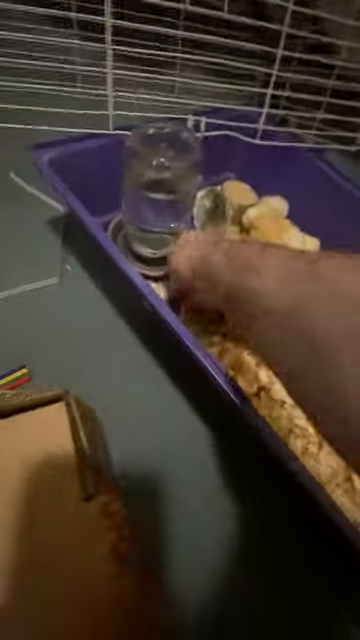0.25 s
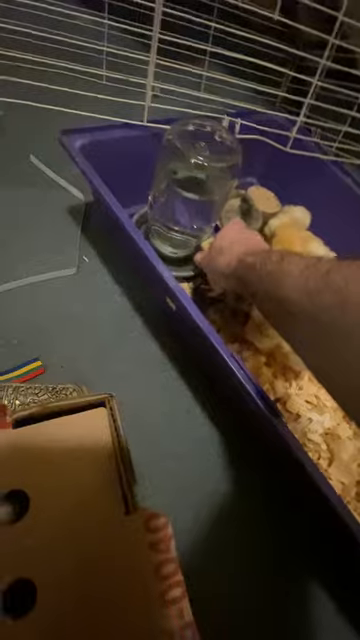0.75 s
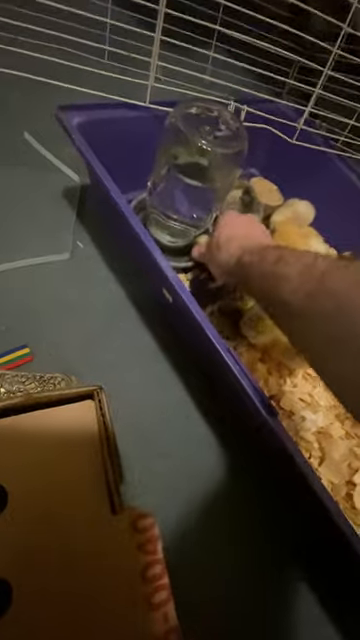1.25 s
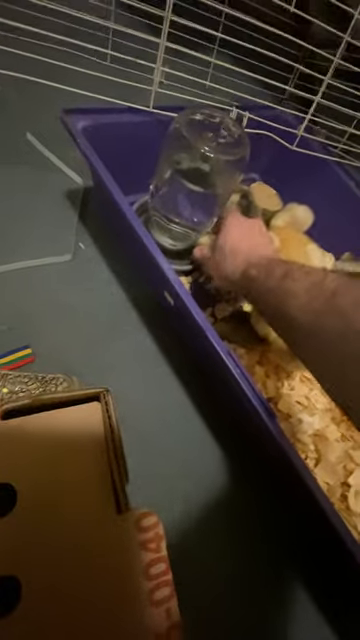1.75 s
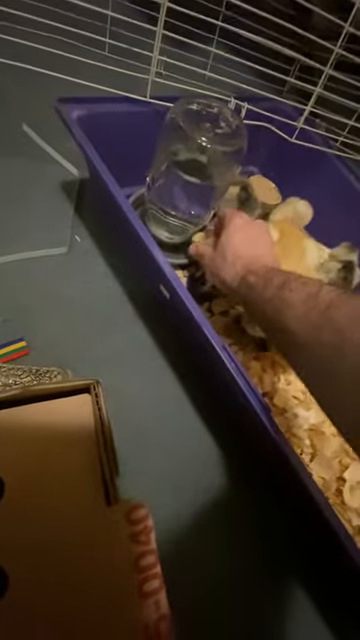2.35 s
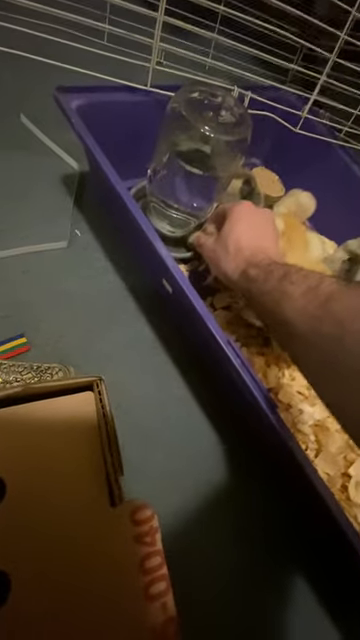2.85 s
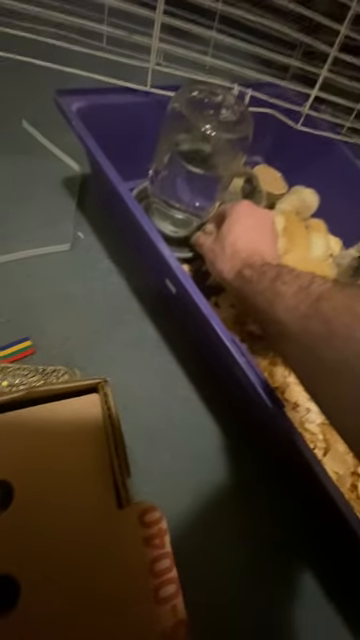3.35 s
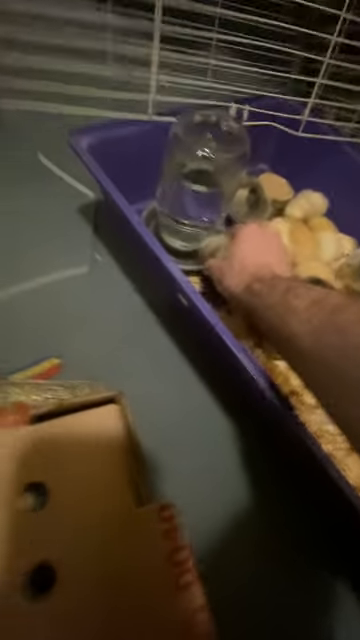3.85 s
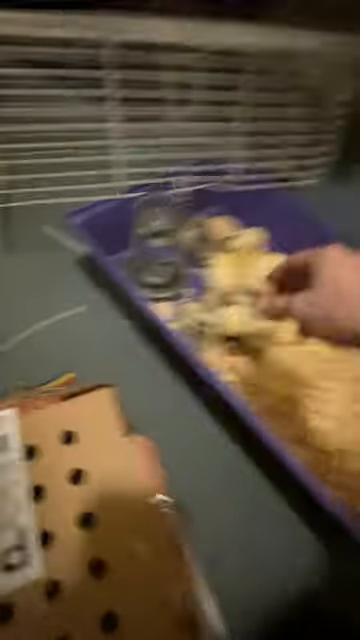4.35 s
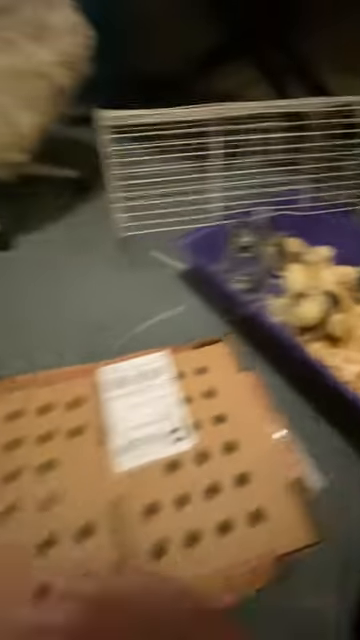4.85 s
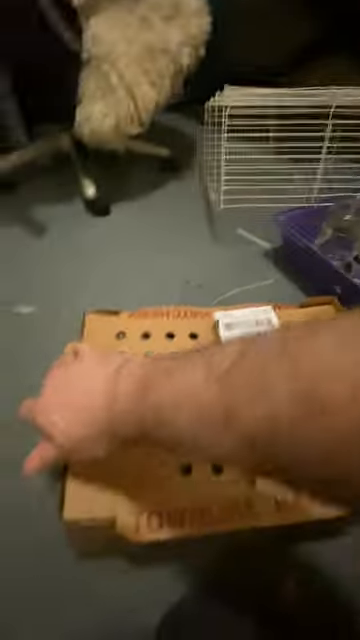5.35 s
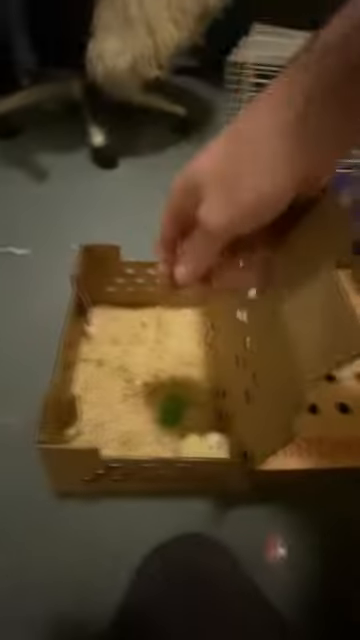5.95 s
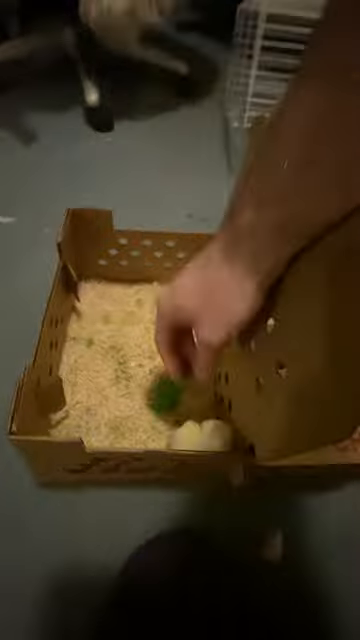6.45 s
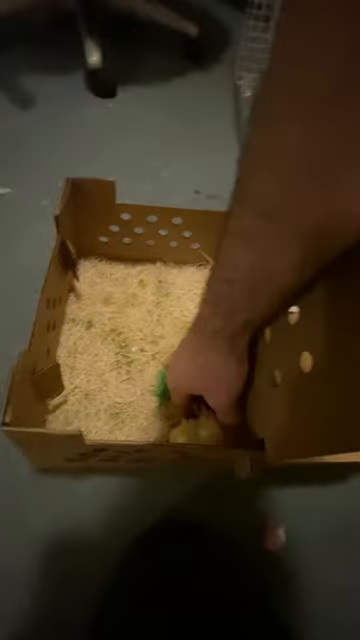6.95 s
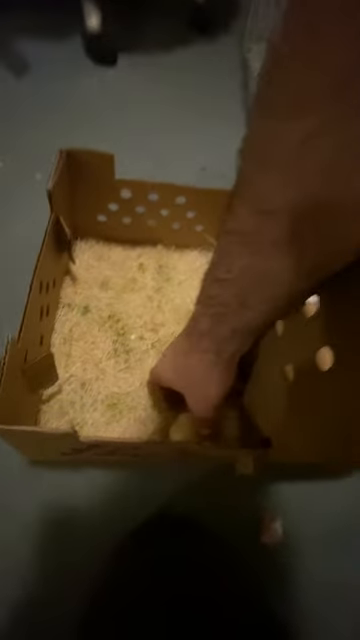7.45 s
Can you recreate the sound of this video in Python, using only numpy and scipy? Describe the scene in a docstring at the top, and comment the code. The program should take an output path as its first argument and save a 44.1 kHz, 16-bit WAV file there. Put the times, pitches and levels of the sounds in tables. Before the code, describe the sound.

A flock of chicks cheeps in high, falling notes, one repeating a hoarse call, while a cardboard box is lightly knocked and scraped.

```python
"""Day-old chicks peep in a plastic tub and a cardboard box, close to a hand-held phone.
From the start the flock whistles in clear falling tones over rustling shavings and a rumbling grip.
One hoarse chick calls once, then about twice a second from 1.3 s. Near 3 s beaks peck the tub;
then fingers tap the shavings and the box knocks. From 5.4 s the lid scrapes and the phone
turns away from the tub, so the voices have less treble and more room."""
import sys
import numpy as np
from scipy import signal
from scipy.fft import rfft, irfft, next_fast_len
from scipy.io import wavfile
from scipy.ndimage import uniform_filter1d, map_coordinates

SR = 44100
rng = np.random.default_rng(int(sys.argv[2]) if len(sys.argv) > 2 else 0)


def inscribe(sig):
    """Save sig as 16-bit PCM at rate SR to the path in sys.argv[1].

    A 1-D sig is mono; a 2-D sig holds one channel per row.
    Samples are clipped to [-1, 1] before scaling.
    """
    pcm = np.round(np.clip(np.atleast_2d(sig).T, -1, 1) * 32767)
    wavfile.write(sys.argv[1], SR, pcm.astype(np.int16))


N = 339129
TIME_S = np.arange(N) / SR


def amp(db):
    return 10 ** (np.asarray(db) / 20)


def unit_rms(x):
    return x / np.sqrt(np.mean(x ** 2) + 1e-20)


def along(points, hz):
    """Interpolate (Hz, value) points on a log axis."""
    f, v = np.transpose(points)
    return np.interp(np.log(hz + 1), np.log(f + 1), v)


def wobble(rate_hz, size=N):
    """Smooth random curve, rate_hz knots a second."""
    knots = rng.standard_normal(int(size * rate_hz / SR) + 4)
    return map_coordinates(knots, [np.arange(size) * rate_hz / SR])


def filtered(x, response):
    """Apply a complex frequency response."""
    size = next_fast_len(x.shape[-1] + 8192)
    return irfft(rfft(x, size) * response(np.fft.rfftfreq(size, 1 / SR)), size)[..., :N]


def add(track, start_s, sound):
    part = track[..., round(start_s * SR):][..., :sound.shape[-1]]
    part += sound[..., :part.shape[-1]]


# Each row: frequency in Hz, left-right coherence from 0 to 1.
COHERENCE = [(200, 0.5), (900, 0.67), (2200, 0.47), (6000, 0.2), (9000, 0.98)]

def diffuse(pair, spectrum):
    """Diffuse field: two unrelated signals become a partly coherent left and right."""
    def response(hz):
        angle = np.arccos(np.clip(along(COHERENCE, hz), 0, 1)) / 2
        return amp(along(spectrum, hz)) * [np.cos(angle), np.sin(angle)]
    mid, side = filtered(pair, response)
    return np.array([mid + side, mid - side])


def grainy_noise(spectrum, depth_db, rate_hz):
    """Diffuse noise with a flickering level."""
    grains = rng.standard_normal((2, N)) * amp(depth_db * wobble(rate_hz))
    return unit_rms(diffuse(grains, spectrum))


# Each row: time in seconds, then rumble, rustle and hiss levels in dB.
HANDLING_LEVELS = [(0, -91, -53.5, -52.5), (.45, -60.5, -60, -54.5), (0.6, -70, -69, -65),
                   (1.2, -74, -62, -66), (2.3, -67, -63.5, -59.5), (3.0, -61, -71.5, -54),
                   (3.4, -63, -93.5, -70.5), (3.9, -62.5, -60, -63), (4.6, -51, -59, -55.5),
                   (4.85, -69.5, -66, -60), (5.4, -59.5, -64, -64), (5.8, -70.5, -66, -47),
                   (5.95, -73, -67.5, -37.5), (6.08, -88, -55, -50), (6.3, -86, -56.5, -40.5),
                   (6.9, -72, -52.5, -44.5), (7.06, -66, -59, -55.5), (7.69, -80.5, -56, -57.5)]

def handling_gain(layer, drift_db, rate_hz):
    """Envelope of one handling noise, with random drift."""
    times_s, *levels_db = np.transpose(HANDLING_LEVELS)
    level_db = np.interp(TIME_S, times_s, levels_db[("rumble", "rustle", "hiss").index(layer)])
    return amp(level_db + drift_db * wobble(rate_hz))


# Each row: frequency in Hz, spectral density in dB.
GRIP_SPECTRUM = [(20, -38), (50, 2), (90, -5), (200, -15), (700, -19), (1200, -76)]

def grip_rumble():
    """The hand on the phone rumbles in lumps."""
    gain = handling_gain("rumble", drift_db=2.5, rate_hz=7)
    return gain * grainy_noise(GRIP_SPECTRUM, depth_db=3.5, rate_hz=28)


# Each row: frequency in Hz, spectral density in dB.
SHAVINGS_SPECTRUM = [(100, -6.5), (400, -5.5), (800, -2), (1250, -7.5), (2200, -8), (5000, -8.5),
                     (10000, -55)]

def shavings_rustle():
    """Feet and fingers stir the shavings."""
    gain = handling_gain("rustle", drift_db=2.4, rate_hz=11)
    return gain * grainy_noise(SHAVINGS_SPECTRUM, depth_db=3, rate_hz=70)


# Each row: start in seconds, level in dB.
FINGER_TAPS = [(3.738, -49.5), (3.997, -41), (4.093, -42.5), (5.507, -40), (5.593, -47), (5.795, -50),
               (6.766, -41.5), (6.944, -44), (7.084, -49.5)]

def finger_taps(t60_s=0.06, attack_s=0.00058):
    """Fingers tap the shavings: short dry puffs."""
    gate, t = np.zeros(N), np.arange(SR // 10) / SR
    for start_s, db in FINGER_TAPS:
        add(gate, start_s, amp(db - 60 * t / t60_s) * (1 - np.exp(-t / attack_s)))
    return gate * unit_rms(diffuse(rng.standard_normal((2, N)), SHAVINGS_SPECTRUM))


def blow(modes, thud_db=0, attack_s=0.0018, crack_t60_s=0.01):
    """A struck wall rings at random strengths, with a papery crack; the last mode is the thud."""
    t = np.arange(SR // 5) / SR
    levels_db = np.array(modes)[:, 1] + rng.normal(0, 0.84, len(modes))
    levels_db[-1] += thud_db
    ring = sum(amp(db - 60 * t / t60_s) * np.sin(2 * np.pi * hz * t)
               for (hz, _, t60_s), db in zip(modes, levels_db))
    crack = 0.24 * amp(-60 * t / crack_t60_s) * rng.standard_normal(len(t))
    return ring * (1 - np.exp(-t / attack_s)) + crack


# Each row: frequency in Hz, level in dB, T60 in seconds.
TUB_MODES = [(526, 6, 0.05), (300, -7.5, 0.033)]
# Each row: start in seconds, level in dB.
BEAK_PECKS = [(2.592, -44), (2.907, -49.5), (3.074, -44.5), (3.133, -50)]

def beak_pecks():
    """Beaks strike the tub wall."""
    track = np.zeros(N)
    for start_s, db in BEAK_PECKS:
        add(track, start_s, amp(db) * blow(TUB_MODES))
    return track


# Each row: frequency in Hz, level in dB, T60 in seconds.
BOX_MODES = [(336, -1.5, 0.043), (435, 1.5, 0.018), (766, -13, 0.04), (84, 11, 0.05)]
# Each row: start in seconds, level in dB, thud gain in dB.
BOX_KNOCKS = [(0.422, -44.5, -25), (3.744, -48, -4.5), (4.091, -32, -36), (4.137, -59, 17),
              (4.362, -47.5, 4), (4.538, -60.5, 17.5), (4.623, -54, 12), (4.685, -43, -12.5),
              (5.508, -21, -25.5), (5.538, -35, -13), (5.79, -65, 13.5), (5.932, -57.5, 9.5),
              (6.766, -39.5, -28.5)]

def box_knocks():
    """Knocks ring the cardboard box."""
    track = np.zeros(N)
    for start_s, db, thud_db in BOX_KNOCKS:
        add(track, start_s, amp(db) * blow(BOX_MODES, thud_db))
    return track


# Each row: start in seconds, end in seconds, level in dB.
LID_SCRAPES = [(5.443, 5.545, -40), (5.842, 5.97, -59), (7.351, 7.613, -52.5)]
# Each row: frequency in Hz, spectral density in dB.
CARD_SPECTRUM = [(2000, -17.5), (4300, -12), (5500, -5.5), (8000, -12), (10300, -12.5)]

def cardboard_friction(rise_s=0.039, fall_s=0.066, width_hz=90):
    """Card and fluff hiss; the scraping lid adds hiss and excites the hollow box."""
    def hollow(f):
        return 1 + sum(1j * f * width_hz / (hz * hz - f * f + 1j * f * width_hz)
                       for hz, _, _ in BOX_MODES[:3])
    scrape = sum(amp(db) * np.clip(np.minimum((TIME_S - start) / rise_s, (end - TIME_S) / fall_s), 0, 1)
                 for start, end, db in LID_SCRAPES)
    body = filtered(grainy_noise(SHAVINGS_SPECTRUM, depth_db=2, rate_hz=200), hollow)
    hiss_gain = handling_gain("hiss", drift_db=2.65, rate_hz=12) + 0.8 * scrape
    return scrape * body + hiss_gain * grainy_noise(CARD_SPECTRUM, depth_db=1, rate_hz=90)


# Each row: frequency in Hz, overtone gain in dB.
BEAK_RESPONSE = [(7300, -2), (8200, -11.5), (9500, -11), (10700, -17.5)]

def syrinx(corners, octave_db, rasp_db, breath_rad, edge_s=0.0065):
    """Gliding, fluttering tone through (s, Hz, dB) corners: 2 for a glide, 3 if held, 4 if hoarse."""
    s, hz, db = np.transpose(corners)
    held, hoarse = len(s) == 3, len(s) == 4
    t = np.arange(s[0] - edge_s, s[-1] + edge_s, 1 / SR)
    age_s, size = t - t[0], len(t)
    leg = np.clip(np.searchsorted(s, t) - 1, 0, len(s) - 2)
    progress = np.maximum(t - s[leg], 0) / np.diff(s)[leg]

    bend = np.where((leg == 0) & (held or hoarse), 1.9, np.where(leg == 2, 1.7, 1.15))
    pitch = hz[leg] + np.diff(hz)[leg] * progress ** bend
    pitch *= 1 + 0.066 * hoarse * (leg == 0) * np.sin(np.pi * progress) ** 2  # strain lifts the note
    scoop, scoop_s = (0.0718, 0.01104) if held else (0.0293, 0.0071)  # slide up into the note
    jitter = 0.01149 * wobble(61.1, size) + 0.0083 * wobble(25.04, size)
    pitch = uniform_filter1d(pitch, 150) * (1 - scoop * np.exp(-age_s / scoop_s) + jitter)
    pitch *= 1 - 0.049 * np.exp((t - t[-1]) / 0.0078)  # the last breath dives

    strain = np.clip((pitch - 4550) / 550, 0.1, 1) * np.minimum(age_s / 0.05, 1)  # high register
    flutter = amp(rasp_db) * strain * (0.32 * wobble(300.7, size) + 0.44 * wobble(3500, size))
    flutter = 2.45 * np.tanh(flutter / 3.07)  # the syrinx cannot swing further
    phase = 2 * np.pi * np.cumsum(pitch) / SR
    phase += (breath_rad + 1.6 * hoarse * strain ** 2) * wobble(350, size)
    subharmonic = 0.18 * hoarse * amp(rasp_db) * strain * np.cos(phase / 2 + 1.56 * wobble(400, size))
    tone = np.sin(phase + 0.8 * flutter) * (1 + 0.384 * flutter + subharmonic)

    # Hoarse overtones come late and falter in the register break.
    faltering = (leg == 0) & (progress < 0.5) | (leg == 1) & (progress < 0.7)
    falter_db = uniform_filter1d(-12.0 * hoarse * faltering, 150)
    for k, offset_db in ((2, 4), (3, 5 + min(octave_db, -2) / 2)):
        gain = amp(octave_db + offset_db + falter_db + along(BEAK_RESPONSE, k * pitch))
        tone += gain * np.sin(k * (phase + flutter)) * (k * pitch < 12000)

    level_bend = np.where((leg == 1) & held, 0.6, 1.11)
    level_db = db[leg] + np.diff(db)[leg] * np.minimum(progress, 1) ** level_bend
    waver_db = 1.6 * wobble(90, size)
    fade = np.clip(np.minimum(0.87 * age_s, t[-1] - t) / (2 * edge_s), 0, 1)
    tone *= np.sqrt(2) * amp(level_db + waver_db) * fade
    wall_echo = np.pad(tone, (rng.integers(40, 130), 0))[:size]
    return tone + 0.35 * wall_echo


# Each row: start, hold and fall in seconds, first, knee and last pitch in Hz,
# knee level in dB, octave gain in dB.
HELD_WHISTLES = [(0.124, 0.13, 0.022, 5277, 3995, 3390, -26, -39),
                 (0.314, 0.046, 0.044, 4280, 3270, 2590, -39.5, -25),
                 (0.333, 0.0764, 0.028, 7300, 7060, 6200, -47, -32),
                 (0.346, 0.089, 0.034, 6750, 5310, 3140, -31, -18),
                 (0.513, 0.093, 0.038, 5230, 4570, 3400, -36, -10),
                 (0.695, 0.13, 0.024, 5250, 4140, 2800, -27.5, -22),
                 (0.808, 0.082, 0.012, 7600, 7550, 6800, -44, -31),
                 (0.814, 0.12, 0.02, 6380, 5080, 3420, -31, -7.5),
                 (0.855, 0.024, 0.029, 4390, 4710, 2910, -40, -16.5),
                 (0.971, 0.086, 0.036, 5350, 4770, 3770, -31.5, -17),
                 (1.269, 0.11, 0.025, 5210, 4360, 2720, -29, -6.5),
                 (1.399, 0.12, 0.018, 6335, 4426, 3270, -30.5, -14),
                 (1.456, 0.049, 0.014, 5070, 5015, 3490, -31.5, -14),
                 (1.749, 0.14, 0.031, 5440, 4120, 2720, -31, -29.5),
                 (1.914, 0.09, 0.049, 5474, 4960, 3150, -31, -15),
                 (2.063, 0.016, 0.057, 4840, 3740, 2680, -39, -11),
                 (2.17, 0.027, .01, 6045, 6000, 5520, -45, -29),
                 (2.431, 0.048, 0.018, 4440, 2820, 2530, -41, -10),
                 (2.833, 0.015, 0.052, 3320, 3900, 2660, -43, -20),
                 (2.943, 0.042, 0.125, 5150, 5040, 2800, -31.5, -31),
                 (3.239, 0.03, 0.042, 3800, 3870, 2950, -47, -17),
                 (3.891, 0.098, 0.075, 5450, 4985, 2830, -34.5, -21),
                 (4.266, 0.065, 0.04, 6100, 6250, 4440, -47, -32),
                 (4.356, 0.095, 0.046, 5440, 4990, 3670, -36.5, -26),
                 (4.633, 0.062, 0.043, 5470, 5050, 2340, -38, -38),
                 (4.869, 0.09, 0.051, 5190, 4790, 2826, -37.5, -12),
                 (5.315, 0.11, 0.03, 5280, 5010, 4000, -42.5, -47),
                 (7.003, 0.092, 0.01, 5770, 5130, 4700, -49.5, -24.5),
                 (7.18, 0.027, 0.054, 5560, 5300, 3460, -37.5, -33),
                 (4.19, 0.037, 0.046, 5160, 4980, 2470, -39.5, -16.5),
                 (5.569, 0.083, 0.025, 5740, 5470, 4950, -40.5, -30),
                 (6.075, 0.066, 0.023, 4565, 3770, 2920, -40.5, -32),
                 (3.807, 0.016, .012, 5780, 5600, 5100, -57, -29),
                 (3.835, 0.018, 0.018, 5650, 5330, 4370, -54, -30),
                 (5.027, 0.13, 0.043, 5800, 5420, 5110, -50.5, -24.5),
                 (4.265, 0.043, 0.012, 7250, 7030, 6740, -53, -31),
                 (7.434, 0.027, 0.018, 4400, 4100, 3563, -46, -36),
                 (7.502, 0.063, 0.011, 5193, 5220, 3460, -42, -7)]

def held_whistles(swell_db=12, fade_db_per_s=186, rasp_db=-15):
    """Clear whistles that swell on a held note, then fall."""
    for start_s, hold_s, fall_s, first_hz, knee_hz, last_hz, db, octave_db in HELD_WHISTLES:
        corners = [(start_s, first_hz, db - swell_db), (start_s + hold_s, knee_hz, db),
                   (start_s + hold_s + fall_s, last_hz, db - fade_db_per_s * fall_s)]
        yield start_s, 0, octave_db, rasp_db, corners


# Each row: start and length in seconds, first and last pitch in Hz, end level in dB, octave gain in dB.
GLIDE_WHISTLES = [(0, 0.036, 5330, 3680, -33.5, -14.5), (0, 0.0072, 4140, 3300, -34.5, -38),
                  (0.372, .059, 4700, 3390, -45, -41.5), (0.694, 0.073, 4555, 2685, -46.5, -9.5),
                  (0.525, 0.049, 4070, 3550, -52.5, -26.5), (0.902, 0.045, 4480, 3900, -43, -29),
                  (0.977, .065, 4160, 2690, -44, -37.5), (1.115, 0.031, 4830, 2980, -43.5, -53),
                  (1.398, .058, 4250, 2723, -38, -15), (1.597, 0.049, 4680, 3420, -39.5, -20),
                  (2.044, 0.11, 5570, 5570, -49.5, -34), (2.159, 0.016, 4300, 3618, -38, -44),
                  (2.501, 0.065, 5770, 5490, -52, -21), (2.553, 0.037, 5650, 5310, -47, -25),
                  (2.656, 0.021, 4227, 3500, -37.5, 2), (3.115, 0.019, 4380, 3850, -40, -28),
                  (3.415, .086, 5590, 4850, -35.5, -21), (3.499, 0.041, 4820, 4110, -38.5, -22),
                  (3.921, 0.082, 7090, 6910, -52.5, -35), (4.11, 0.045, 5630, 5730, -49, -30),
                  (4.614, 0.055, 3525, 2630, -40.5, -9), (4.566, 0.068, 5820, 5530, -46, -37),
                  (5.195, 0.033, 4120, 2590, -43.5, -33), (7.086, 0.03, 4720, 3130, -37.5, -27),
                  (5.769, .05, 3910, 2950, -48, -17), (5.952, 0.06, 3740, 3270, -51, -30),
                  (1.656, 0.078, 5470, 5180, -54, -32), (5.75, .055, 5970, 4830, -42, -27),
                  (6.454, .06, 4210, 3200, -49.5, -29), (6.139, 0.073, 7370, 6900, -45, -36),
                  (6.188, 0.059, 6810, 4590, -33, -38), (5.982, .14, 5790, 5140, -45.5, -38),
                  (5.509, 0.039, 6100, 5740, -55.5, -37), (5.652, 0.033, 3995, 3050, -37, -4),
                  (6.479, 0.066, 5530, 4760, -52, -31), (6.561, 0.055, 4700, 3290, -42.5, -12),
                  (6.61, .024, 4020, 3105, -35.5, -12.5), (6.687, 0.071, 6920, 4990, -31, -38),
                  (6.901, 0.027, 4520, 3780, -43.5, -32), (6.969, 0.043, 3990, 3440, -41, -39.5),
                  (7.275, 0.034, 4210, 3280, -40.5, -41), (7.503, 0.058, 5720, 5460, -53.5, -36)]

def glide_whistles(swell_db_per_s=79, rasp_db=-15):
    """Short peeps that swell over a single glide."""
    for start_s, length_s, first_hz, last_hz, db, octave_db in GLIDE_WHISTLES:
        corners = [(start_s, first_hz, db - swell_db_per_s * length_s), (start_s + length_s, last_hz, db)]
        yield start_s, 0, octave_db, rasp_db, corners


def far_answers(flock, cues, count=44, level_db=-52, max_lag_s=0.3, octave_db=-18, rasp_db=-14):
    """Far chicks repeat the flock's whistles faintly, each set off by a cue call."""
    for pick, cue, lag in rng.random((count, 3)):
        corners = flock[int(pick * len(flock))][-1]
        start_s = cues[int(cue * len(cues))][0] + max_lag_s * lag
        yield start_s, level_db - max(db for _, _, db in corners), octave_db, rasp_db, corners


# Each row: start, hold, drop and tail in seconds, last pitch in Hz,
# levels before and after the drop in dB, octave and rasp gains in dB.
HOARSE_CALLS = [(0.138, 0.082, 0.015, 0.029, 2344, -29.5, -31, -8, -1),
                (1.303, 0.06, 0.017, 0.028, 2515, -37, -33, -8.5, 0),
                (1.724, 0.083, 0.019, 0.039, 2440, -33, -32.5, 1, 5),
                (2.172, 0.095, 0.015, .042, 2420, -30.5, -32.5, 0, 1),
                (2.572, 0.12, 0.015, 0.037, 2464, -33, -32.5, 2.5, 5),
                (3.025, 0.12, .013, 0.038, 2465, -31.5, -31.5, -2.5, 6.5),
                (3.495, 0.1, 0.014, 0.035, 2480, -30.5, -29, -4, 2),
                (4.017, 0.099, 0.019, .032, 2449, -32.5, -32.5, -3.5, 4),
                (4.385, 0.11, .018, 0.034, 2490, -31, -33, -6, 4),
                (4.752, 0.088, 0.018, .044, 2594, -31, -32.5, -2, 1.5),
                (5.17, .105, 0.012, 0.04, 2530, -35.5, -37.5, -4.5, 4.5),
                (5.571, 0.11, .017, 0.035, 2530, -38.5, -35, 0, 2),
                (6.187, 0.047, 0.0079, 0.045, 2390, -38, -43, 0.5, 5.5),
                (6.648, 0.035, 0.017, 0.027, 2830, -42, -37.5, -11, -15),
                (7.083, 0.077, 0.014, 0.047, 2600, -41, -39.5, -1.5, 6.5),
                (7.528, 0.099, 0.011, 0.044, 2560, -42.5, -39.5, -2, 9.5)]

def hoarse_calls(held_hz=4993, sagged_hz=4640, low_hz=3334, swell_db=11.5, fade_db=1.5):
    """One chick holds a strained note, drops a register and trails off."""
    for start_s, hold_s, drop_s, tail_s, last_hz, held_db, low_db, octave_db, rasp_db in HOARSE_CALLS:
        break_s = start_s + hold_s
        corners = [(start_s, held_hz, held_db - swell_db), (break_s, sagged_hz, held_db),
                   (break_s + drop_s, low_hz, low_db),
                   (break_s + drop_s + tail_s, last_hz, low_db - fade_db)]
        yield start_s, 0, octave_db, rasp_db, corners


# Each row: frequency in Hz, gain in dB.
TUB_RESPONSE = [(2600, 1.5), (3300, 2), (4050, 0), (4500, 2), (5050, 0.5), (5900, 0.5), (6700, -2)]

def chicks():
    """All calls, each a little to one side, coloured by the tub."""
    flock = [*held_whistles(), *glide_whistles()]
    hoarse = list(hoarse_calls())
    track = np.zeros((2, N))
    for start_s, gain_db, octave_db, rasp_db, corners in [*flock, *hoarse, *far_answers(flock, hoarse)]:
        gains = amp(gain_db + rng.normal(0, 1) * np.array([[1], [-1]]))
        breath_rad = 0.46 if start_s > 5 else 0.16  # boxed-in calls are breathier
        add(track, max(start_s - 0.006, 0), gains * syrinx(corners, octave_db, rasp_db, breath_rad))
    return filtered(track, lambda hz: amp(along(TUB_RESPONSE, hz)))


def wall_reverb(x, t60_s=0.17, block=SR // 4):
    """The tub and near walls return a short diffuse tail, new for each block."""
    wet, t = np.zeros((2, N)), np.arange(SR // 3) / SR
    for start in range(0, N, block):
        tail = rng.standard_normal((2, len(t))) * amp(-60 * t / t60_s) * (t > 0.002)
        tail /= np.linalg.norm(tail[0])
        add(wet, start / SR, signal.fftconvolve(x[None, start:start + block], tail, axes=1))
    return diffuse(wet, [(2500, -2.3), (5000, -0.79)])


def scene():
    """Voices, blows and handling; turning from the tub cuts treble and adds room."""
    turned = np.interp(TIME_S, [5.4, 5.9], [0, 1])
    voices = chicks()
    voices -= 0.24 * turned * filtered(voices, lambda hz: hz > 7200)
    direct = voices + box_knocks() + beak_pecks()
    room = amp(-8 + 4.7 * turned) * wall_reverb(direct.mean(axis=0))
    return direct + room + shavings_rustle() + cardboard_friction() + grip_rumble() + finger_taps()


# Each row: frequency in Hz, left minus right level in dB.
STEREO_BALANCE = [(60, 5), (140, 2.5), (340, 1.5), (790, 2), (1880, -3), (4450, -6), (10500, 2)]
# Each row: frequency in Hz, left phase lead in radians.
LEFT_LEAD = [(0, 8), (260, 0.0), (520, -2.5), (2330, -2), (3960, -5), (4740, -2.5), (5510, -0.3), (7410, 2),
             (8530, 1.43), (9650, 1.83), (10700, 3)]
BAND_LIMIT_HZ = 11127

def record(dry):
    """Left and right differ in level and phase; treble stops above 11 kHz."""
    def response(hz):
        half = np.array([[0.5], [-0.5]])
        gain = amp(half * along(STEREO_BALANCE, hz)) * (hz < BAND_LIMIT_HZ)
        return gain * np.exp(1j * half * along(LEFT_LEAD, hz))
    return filtered(dry, response)


dry = scene()
out = record(dry)
inscribe(out)
```